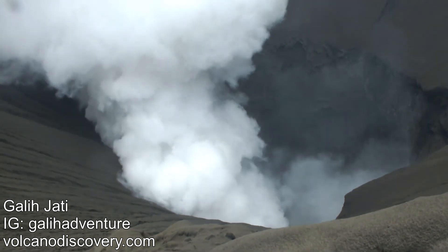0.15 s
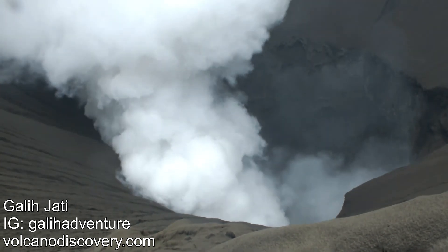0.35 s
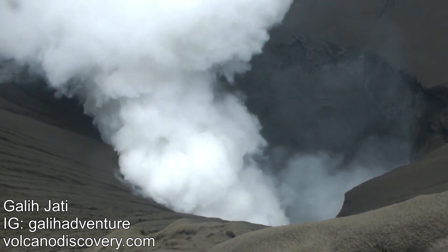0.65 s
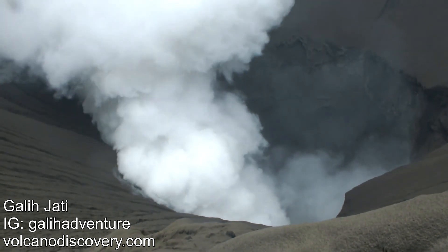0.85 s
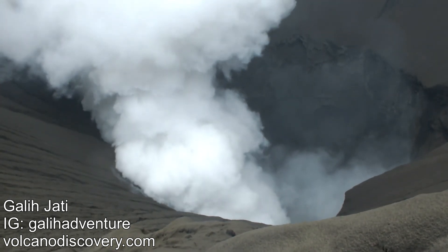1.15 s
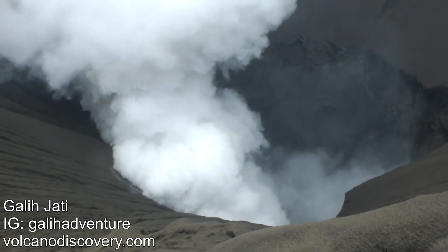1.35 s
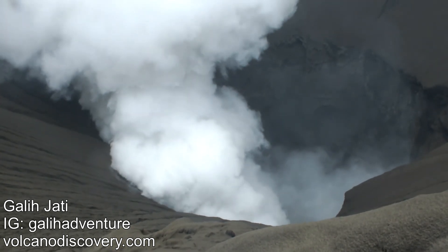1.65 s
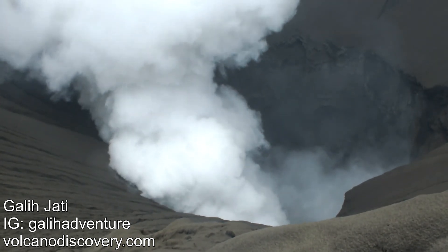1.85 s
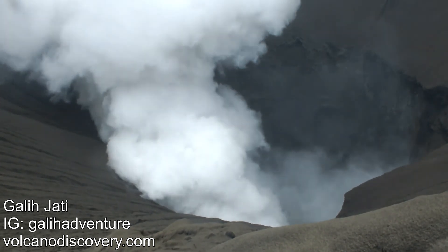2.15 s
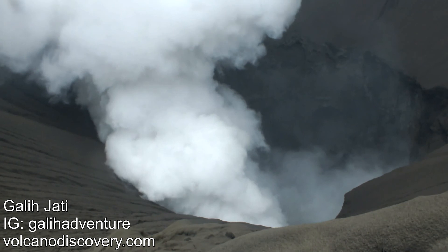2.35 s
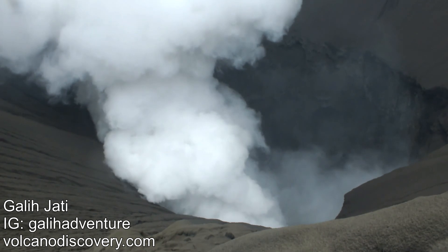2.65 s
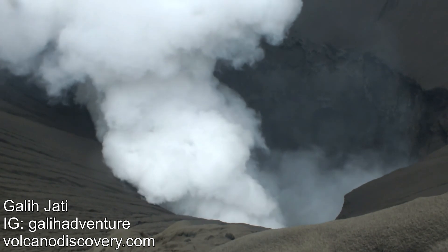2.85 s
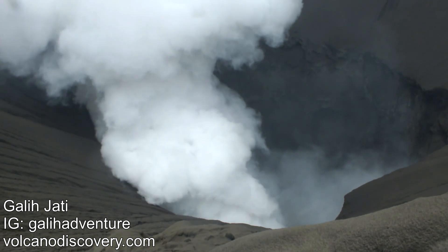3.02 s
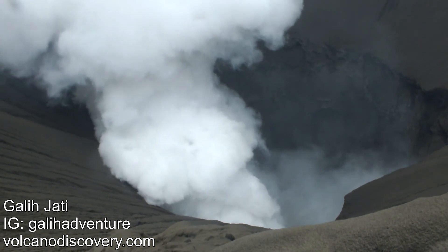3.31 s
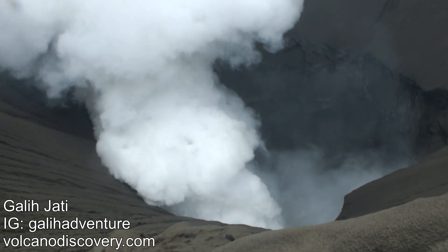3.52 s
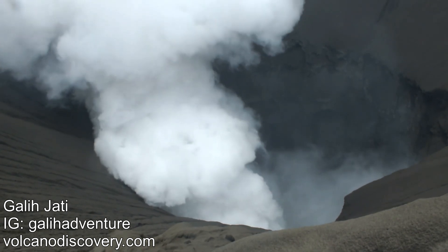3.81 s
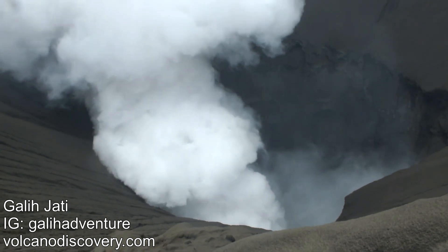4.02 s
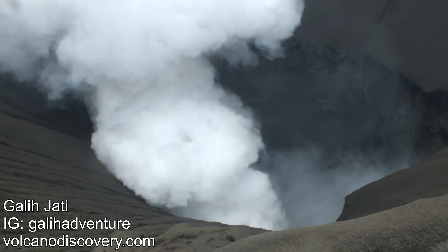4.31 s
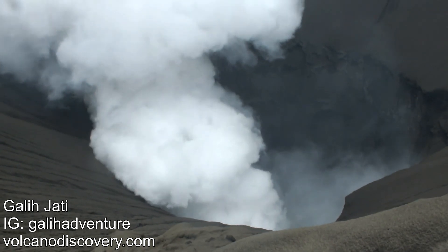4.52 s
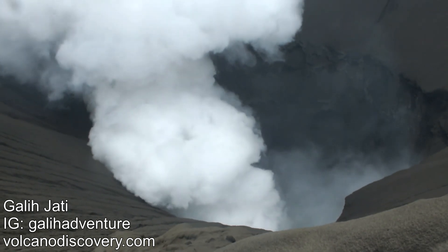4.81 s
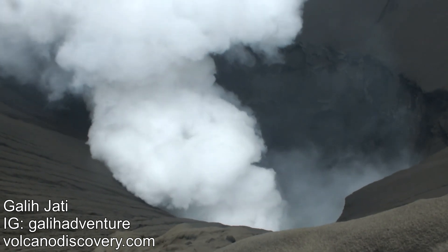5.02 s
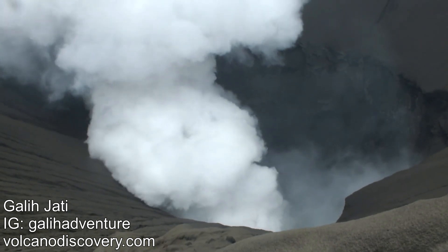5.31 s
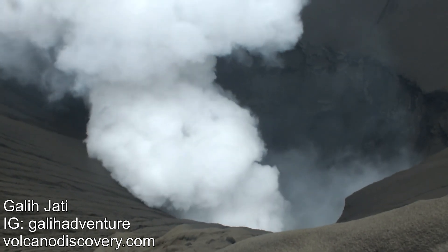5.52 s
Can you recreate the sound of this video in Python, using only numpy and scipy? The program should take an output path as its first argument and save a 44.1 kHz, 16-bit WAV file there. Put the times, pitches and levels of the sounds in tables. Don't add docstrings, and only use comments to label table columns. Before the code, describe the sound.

Heavy low rushing from a distant steam vent, bass-rich and fluttering unevenly, never stopping, heard outdoors from a crater rim.

```python
import sys
import numpy as np
from scipy import signal
from scipy.fft import rfft, irfft
from scipy.io import wavfile
from scipy.ndimage import uniform_filter1d

SR = 44100
rng = np.random.default_rng(int(sys.argv[2]) if len(sys.argv) > 2 else 0)


def linear_from_db(decibels):
    return 10 ** (np.asarray(decibels, float) / 20)


def dump(signal):
    limited = np.clip(np.atleast_2d(signal).T, -1, 1)
    pcm = np.round(limited * 32767).astype(np.int16)
    wavfile.write(sys.argv[1], SR, pcm)


N = 250047
HZ = np.maximum(np.fft.rfftfreq(N, 1 / SR), 1)


def in_time(rows):
    s, *columns = np.transpose(rows)
    return [np.interp(np.arange(N) / SR, s, c) for c in columns]


def over_hz(rows):
    hz, *columns = np.transpose(rows)
    return [np.interp(np.log(HZ), np.log(hz), c) for c in columns]


def drift(rate):
    r = np.exp(-80 * np.pi * rate / SR)
    white = rng.standard_normal(N // 40 + 2002)
    slow = signal.lfilter([1], [1, -2 * r, r * r], white)[2000:]
    return np.interp(np.arange(N) / 40, np.arange(len(slow)), slow / slow.std())


def swells(rows, half_s, column=1):
    t = np.arange(0, N, 64) / SR
    level_db = sum(row[column] * np.exp(-.5 * ((t - row[0]) / half_s) ** 2) for row in rows)
    return np.interp(np.arange(N) / SR, t, level_db)


def power_over(x, span_s):
    size = int(span_s * SR)
    return uniform_filter1d(uniform_filter1d(x ** 2, size), size) + 1e-20


def lag(x, tau_s):
    r = np.exp(-1 / (tau_s * SR))
    return signal.lfilter([1 - r], [1, -r], x, zi=[r * x[:SR // 8].mean()])[0]


def recorder_noise():
    # (frequency [Hz], level [dB])
    hiss_colour = [(2000, 3.5), (7000, 2.5), (8000, 0), (11000, -3), (14000, -6.5), (15000, -7.5),
                   (15500, -6), (16000, -10)]
    # (frequency [Hz], rms level [dB])
    whine_tones = [(12952, -98), (14356, -90), (15610, -80.5)]
    hiss_db, alike, wobble_hz = -68.5, 0.37, 2.2
    low_cut = 1 / (1 + (3000 / HZ) ** 4)
    top_cut = HZ < 16000
    white = rng.standard_normal((3, N))
    white = np.sqrt(1 - alike) * white[:2] + np.sqrt(alike) * white[2]
    hiss = irfft(rfft(white) * linear_from_db(over_hz(hiss_colour)[0]) * low_cut * top_cut, N)
    unsteady_db = hiss_db + .6 * drift(9) + .8 * drift(30)
    hiss = hiss / hiss.std() * linear_from_db(unsteady_db) * linear_from_db([[.4], [-.4]])
    cycles = np.cumsum(1 + wobble_hz / 15000 * drift(3)) / SR
    whines = sum(np.sqrt(2) * linear_from_db(db) * np.sin(2 * np.pi * hz * cycles) for hz, db in whine_tones)
    return hiss + whines


def deep_shudder():
    # (time [s], level [dB])
    shudder_events = [(0.15, 2.5), (0.37, 4.5), (0.6, .6), (0.8, .6), (0.97, -3), (1.2, 0), (1.5, 2.5),
                      (1.82, 3), (2.0, 1.5), (2.25, 4), (2.5, -2), (2.75, 0), (3.0, -3), (3.3, -0.5),
                      (3.5, -3), (3.7, 7.5), (3.95, 1.5), (4.25, -2), (4.55, 1.5), (4.85, -3.5),
                      (5.1, -0.5), (5.35, 0), (5.6, -1.7)]
    return swells(shudder_events, half_s=.06)


def gas_slugs():
    # (time [s], level [dB])
    heave_events = [(0.02, -2), (0.25, .6), (1.24, -1), (1.45, 0.5), (1.6, 1.3), (1.72, 1), (1.85, 1),
                    (2.4, 1.5), (2.6, 1.5), (2.82, 0.1), (3.63, -0.2), (4.05, -0.5), (4.27, -0.5),
                    (5.2, .6), (5.6, -0.3), (0.11, 3), (0.4, -5), (0.445, -3), (0.57, -6), (0.75, -7),
                    (0.9, -4), (1.07, -5.5), (1.16, -1), (1.32, 0), (1.99, 2.5), (2.11, -0.5), (2.32, 0.5),
                    (2.49, 1.5), (2.69, -1.5), (2.94, -2), (3.1, 3.5), (3.19, 2), (3.38, 3), (3.48, 1),
                    (3.78, -4.5), (3.9, 0), (4.17, 1.5), (4.38, 6), (4.56, 5), (4.71, 5.5), (4.79, -2.5),
                    (4.95, 5), (5.06, 0), (5.37, -1.5), (5.48, -4.5)]
    return swells(heave_events, half_s=0.034)


def rumble_pitch():
    # (time [s], upper over lower part [dB])
    roll_events = [(0.1, 5), (0.33, 1), (0.48, -3), (0.62, 3.5), (0.75, -8), (0.87, -7.5), (1.0, 9.5),
                   (1.14, -11), (1.37, -3), (1.55, 3), (1.7, -4), (1.82, 8.5), (1.94, 3.5), (2.06, 3.5),
                   (2.23, 4), (2.45, -9), (2.7, 5), (2.9, -8), (3.15, 4), (3.4, -7), (3.6, -3.5), (3.85, 1),
                   (4.1, 4), (4.25, -2.5), (4.4, -2.5), (4.55, 8.5), (4.66, 0.5), (4.76, -2.5),
                   (4.93, -6.5), (5.1, 3.5), (5.2, 4.5), (5.33, 8), (5.45, -5.5), (5.6, -0.5)]
    return swells(roll_events, half_s=0.037) / 2


def rumble_throb():
    # (time [s], level [dB])
    throb_events = [(0.04, 2), (0.36, 3), (0.41, -1.5), (0.39, -1), (0.435, -5.5), (0.455, -8),
                    (0.475, 2.5), (0.505, 3.5), (0.71, 3.5), (0.85, -7), (1.29, 0.5), (1.42, -0.5),
                    (1.54, -2.5), (1.6, 3.5), (1.65, -7), (1.77, -2.5), (2.08, -2), (2.3, -2.5), (2.47, 1),
                    (2.67, 4), (2.76, 4), (2.85, 3.5), (1.92, 4.5), (2.18, 0.5), (2.4, 1), (2.53, -6),
                    (2.71, 0), (2.98, 5.5), (3.09, 1.5), (3.14, -7), (3.37, 0.5), (3.55, 2), (3.9, 1.5),
                    (4.33, 1), (4.92, 4), (5.42, 1), (5.59, 2), (5.665, 6.5), (3.29, 8), (3.47, -2),
                    (3.69, -5.5), (4.06, -3), (4.25, 5.5), (4.43, -3.5), (4.55, 1.5), (4.66, 0.5),
                    (4.8, -9), (5.04, -1.5), (5.1, 1.5), (5.17, -4), (5.38, -3)]
    return swells(throb_events, half_s=0.0067)


def throat_eddies():
    # (time [s], level [dB])
    eddy_events = [(0.04, -0.5), (0.27, -0.3), (0.62, 0.3), (1.17, -1.5), (2.3, 1.3), (2.45, 0), (2.71, .6),
                   (2.95, 1.3), (3.2, .6), (3.45, -0.3), (3.9, 0), (4.2, 0.4), (4.5, 0.5), (4.8, .6),
                   (5.07, 1), (5.63, 2.2), (0.15, 2.5), (0.41, 1), (0.45, -2.5), (0.5, 3), (0.75, -3),
                   (0.88, -3), (0.96, -2.5), (1.06, -3), (1.29, -3), (1.42, 2.5), (1.59, 3.5), (1.65, 2),
                   (1.73, 6), (1.85, 2.5), (1.93, -0.5), (2.03, 0), (2.16, 2.5), (2.6, -5.5), (2.82, -6.5),
                   (3.09, 1), (3.31, -1), (3.6, -3), (3.77, -2.5), (4.05, 0.5), (4.39, 3), (4.66, 1.5),
                   (4.93, -2.5), (5.2, 0.5), (5.35, -1), (5.42, 3.5), (5.55, 0)]
    return swells(eddy_events, half_s=0.037)


def throat_swirl():
    # (time [s], level [dB])
    swirl_events = [(0.05, -2.5), (0.2, 2.5), (0.44, -4), (0.65, -3), (0.8, -2), (0.95, 0.5), (1.1, -4.5),
                    (1.25, 0), (1.45, 0), (1.6, -2.5), (1.75, -2), (1.95, 3), (2.15, 2), (2.3, 0.5),
                    (2.45, -3.5), (2.65, 1), (2.9, -4), (3.1, 0), (3.3, 1.5), (3.5, 2), (3.65, -2),
                    (3.8, -1), (3.95, -2), (4.1, 2), (4.25, -5), (4.4, 2.5), (4.6, 2), (4.85, 1),
                    (5.0, -0.5), (5.15, -6), (5.3, -1.5), (5.45, -3.5), (5.6, -2.5)]
    return swells(swirl_events, half_s=0.052)


def rumble_lull():
    # (time [s], level [dB])
    lull_events = [(0.15, -2), (0.5, 0), (0.8, -0.5), (1.1, -2.5), (1.5, -1), (1.9, -0.5), (2.3, 0.5),
                   (2.6, 2), (2.9, 1), (3.3, .5), (3.6, -1.5), (3.9, -1.5), (4.2, -1), (4.5, 0), (4.8, 1.5),
                   (5.0, -1), (5.2, 7), (5.45, 1.5)]
    return swells(lull_events, half_s=0.1)


def low_roar():
    # (time [s], level [dB])
    gust_events = [(0.1, -2), (0.3, 2.6), (0.5, -2.5), (0.68, 0.5), (0.85, 1), (1.05, 0.5), (1.25, 0.5),
                   (1.55, 1), (1.8, 0.5), (2.0, 0), (2.2, 0), (2.45, 1.3), (2.62, 2), (2.72, 2), (2.95, 0),
                   (3.1, -0.5), (3.25, 1.5), (3.45, -0.5), (3.65, -1), (3.8, -0.8), (4.0, -3.5), (4.2, 0.5),
                   (4.5, 0.5), (4.75, 0), (5.0, -0.5), (5.3, 0.5), (5.5, -2.5)]
    # (time [s], level [dB])
    surge_events = [(0.3, -2.5), (0.6, 3.5), (0.8, -1.5), (0.98, -0.5), (1.3, 1), (1.7, 3), (2.1, -1.5),
                    (2.4, -1.5), (2.61, 1), (2.645, -4), (2.672, 3), (2.73, -4.5), (2.96, 2.5), (3.2, -2.5),
                    (3.6, -3), (4.1, -0.5), (4.3, -1.5), (4.65, 2), (5.1, -1.5), (5.45, 0)]
    return swells(gust_events, half_s=0.1) + swells(surge_events, half_s=0.016)


def mouth_puffs():
    # (time [s], level [dB], brightness [dB])
    puff_events = [(0.18, 3, -0.5), (0.31, 2, 0.5), (0.4, -1, 0.3), (0.06, 0, .3), (0.25, 0, 1.4),
                   (0.5, 0.7, -0.7), (0.6, 1, .3), (0.7, -0.4, -0.8), (0.8, .5, -0.8), (0.87, -0.7, 0.7),
                   (1.01, -0.3, 0), (1.26, -0.6, 1.3), (1.35, 0, 0), (1.56, 0.5, 0.5), (1.67, 0, 1.1),
                   (1.96, 0.4, 1), (2.45, 0.1, -0.3), (2.56, -0.2, -0.3), (2.73, 1.3, -0.3),
                   (3.13, -.6, .3), (3.25, -0.1, 0.5), (3.74, -0.1, -1.5), (4.0, 0.4, -0.2),
                   (4.14, -0.6, -0.5), (4.28, 0.8, -0.4), (4.64, 1.2, 0.7), (4.81, 0.3, .3),
                   (5.12, -1.5, -0.5), (5.3, -1, 0.7), (5.4, -0.8, .3), (5.5, -0.5, .3), (5.6, .6, .3),
                   (0.93, 1.4, 1), (1.1, 0, 0), (1.17, -0.7, 1), (1.45, -0.8, 1), (1.79, 2, 0),
                   (1.88, -0.5, 1.5), (2.04, -0.5, 0.2), (2.14, 2, -0.6), (2.22, -0.5, 1), (2.34, 2, -0.2),
                   (2.66, -1.4, 0), (2.8, -0.5, 1.5), (2.89, -2.5, 1), (2.93, 0, 0.4), (2.97, 4.5, -0.3),
                   (3.02, -2.7, 0.5), (3.37, 1.5, 0.5), (3.51, -0.2, 1), (3.58, -1.0, 0), (3.67, -3.5, 0),
                   (3.81, 1, -0.7), (3.91, -2.7, -2), (4.43, -1.5, -0.5), (4.56, 2, -0.5),
                   (4.72, -0.5, -0.5), (4.91, 2, 0), (5.04, -3, 0), (5.2, 0, -0.1)]
    # (time [s], level [dB])
    flutter_events = [(0.1, 2.5), (0.34, 3), (0.4, 1), (0.5, -3.5), (0.58, -1.8), (0.75, 1.2), (1.01, -1),
                      (1.17, -3.8), (1.35, -0.5), (1.42, 4), (1.52, 2), (1.58, 2.3), (1.64, 0), (2.08, 1.5),
                      (2.19, -3), (2.4, -3.5), (2.47, 2), (2.71, -4.5), (2.925, 4.5), (2.948, -5.5),
                      (3.005, 2.5), (3.8, 0), (3.05, 3), (3.085, 4), (3.11, -1.5), (3.45, 2), (3.86, 2),
                      (4.02, 1.5), (4.1, 1.7), (4.2, 4.5), (4.37, -0.5), (4.88, -1), (5.04, 3), (5.12, 2),
                      (5.52, 0.5)]
    puff = swells(puff_events, half_s=0.026) + .8 * swells(flutter_events, half_s=0.0084)
    return puff, swells(puff_events, half_s=0.026, column=2)


def top_wisps():
    # (time [s], level [dB])
    wisp_events = [(0.1, 0.8), (0.4, 0.2), (0.7, 0.8), (1.0, .4), (1.3, 1.5), (1.6, .4), (1.9, -.4),
                   (2.2, 0.5), (2.5, -0.5), (2.83, 0), (2.95, -0.5), (3.04, 0.8), (3.3, 0), (3.6, -0.8),
                   (3.9, .4), (4.1, -0.5), (4.35, -1.5), (4.6, -0.7), (4.8, 0), (5.0, -0.8), (5.25, 0),
                   (5.5, 0)]
    return swells(wisp_events, half_s=0.043)


def surges():
    # (time [s], pressure deep in the throat [dB], flow at the mouth [dB])
    vent_work = [(0.0, -3, -1), (0.4, -2, -1), (0.81, 0.5, 1), (1.21, 4.5, 0.7), (1.62, -0.3, 1.2),
                 (2.02, 0.5, 0.7), (2.43, 0.5, 3.5), (2.84, 9, 3), (3.24, 4, 4), (3.64, 2, 3),
                 (4.05, 4, 0.2), (4.46, -2, -1.5), (4.86, -3.5, -3.5), (5.26, -4.5, -3), (5.67, -4, -3)]
    # (mean level [dB], share of pressure [dB/dB], share of flow [dB/dB])
    zone_drive = [
        (-37, 0.75, .05),
        (-29.5, 0.9, .01),
        (-30.5, 0.91, .05),
        (-30.5, 0.35, 0.92),
        (-32.5, 0.33, 0.49),
        (-39, 0.3, 0.6),
        (-36.5, 0.13, 0.52),
        (-38, .1, 0.91),
        (-41.5, .02, 0.96),
        (-55.5, .01, 0.91),
    ]
    pressure, flow = in_time(vent_work)
    heave, roll, throb = gas_slugs(), rumble_pitch(), rumble_throb()
    eddy, swirl = throat_eddies(), throat_swirl()
    puff, bright = mouth_puffs()
    events = [0.41 * heave + .4 * throb + deep_shudder(),
              1.19 * heave - roll + throb,
              1.0 * heave + roll + throb,
              1.19 * eddy + 0.096 * heave + throb,
              0.39 * eddy + swirl + 0.72 * throb,
              0.55 * eddy + 0.55 * swirl + rumble_lull(),
              0.62 * (puff - bright) + low_roar(),
              1.13 * (puff - 0.79 * bright),
              0.96 * (puff + bright),
              0.75 * (puff + bright) + top_wisps()]
    return [db + deep * pressure + mouth * flow + event
            for (db, deep, mouth), event in zip(zone_drive, events)]


def jet_at_ports():
    # (frequency [Hz], level [dB per Hz])
    jet_colour = [(15, -15.5), (40, -14.5), (85, 8.5), (130, 5.5), (220, -7), (320, -9.5), (480, -12.5),
                  (1000, -15.5), (1500, -20.5), (2600, -31), (3200, -37.5), (4650, -45), (6200, -59.5),
                  (16000, -100)]
    # (frequency [Hz], width [Hz], depth [dB])
    slope_notches = [(51, 5.3, -1.5), (94, 13, -7.5), (111.9, 6.2, -5), (162.7, 25, -9.5),
                     (368.3, 74, -16.5), (855, 87, -6), (1158, 190, -7), (1750, 170, -5.5), (3650, 480, -6)]
    # (frequency [Hz], left over right [dB], left leads [rad], scattered share [dB])
    port_colour = [(20, 2, .3, -16.5), (100, 2.5, .07, -25.5), (300, 2.5, -.07, -25.5),
                   (650, 1, -0.16, -17.5), (1010, 3.5, 0.12, -11), (1250, 0.5, -0.28, -9),
                   (1980, 0, -0.63, -9.5), (2720, -9, -0.58, -6.5), (3160, -2, 0.64, -7.5),
                   (3800, -0.5, 0.49, -8), (4600, 2.5, -0.46, -6.5), (5040, 0.5, -1.3, -9.5),
                   (6500, -1.5, 0.15, 2.5), (8830, 2.5, .5, 15.5)]
    direct, left, right = rfft(rng.standard_normal((3, N)))
    echo_db = sum(depth_db / (1 + ((HZ - hz) / width_hz) ** 2 * 4)
                  for hz, width_hz, depth_db in slope_notches)
    balance_db, lead, scatter_db = over_hz(port_colour)
    port = linear_from_db(balance_db / 2) * np.exp(.5j * lead)
    scatter = linear_from_db(scatter_db - 1.0 + .4 * echo_db)
    arriving = direct * linear_from_db(echo_db) + scatter * np.array([left, right])
    share = np.sqrt(1 + linear_from_db(2 * scatter_db) / 2)
    return arriving / share * np.array([port, 1 / port]) * linear_from_db(over_hz(jet_colour)[0])


def jet(flicker_db, gust_db, steady):
    zone_borders = [55, 105, 150, 210, 300, 400, 850, 1700, 3400]
    spectra, levels_db = jet_at_ports(), surges()
    zones = np.zeros((len(levels_db), 2, N))
    gust = drift(7)
    octave = np.log2(HZ / 18.75)
    borders = np.log2(np.array(zone_borders) / 18.75)
    for centre in np.arange(0.25, 10, .5):
        window = np.cos(np.pi * np.clip(octave - centre, -.5, .5)) ** 2
        turbulence = np.clip((centre - 3.0) / 2.8, .1, 1)
        gain = linear_from_db(turbulence * (gust_db * gust + flicker_db * drift(3.8)))
        zones[np.searchsorted(borders, centre)] += gain * irfft(spectra * window, N)
    out = 0
    for zone, level_db in zip(zones, levels_db):
        mid = zone.mean(axis=0)
        even = (power_over(mid, 0.082) / np.mean(mid ** 2)) ** (steady / 2)
        out = out + linear_from_db(level_db) * zone / even / (mid / even).std()
    return out


def scene():
    return jet(flicker_db=0.77, gust_db=0.67, steady=0.84)


def gain_control(x):
    ride, memory_s, pivot_db = 0.5, 0.072, -24
    peak_ride, attack_s, release_db_per_s = 0.11, 0.0061, 67
    power = np.mean(x ** 2, axis=0) + 1e-12
    fall_db = release_db_per_s * np.arange(N) / SR
    loud_db = 10 * np.log10(lag(lag(power, memory_s), memory_s))
    held_db = np.maximum.accumulate(10 * np.log10(power) + fall_db) - fall_db
    peak_db = lag(held_db, attack_s)
    return x * linear_from_db(-ride * (loud_db - pivot_db) - peak_ride * (peak_db - peak_db.mean()))


def low_pass(x):
    return signal.sosfilt(signal.butter(12, 15730, fs=SR, output="sos"), x)


def record(dry):
    mix = gain_control(dry + recorder_noise())
    return low_pass(mix)


dry = scene()
out = record(dry)
dump(out)
```